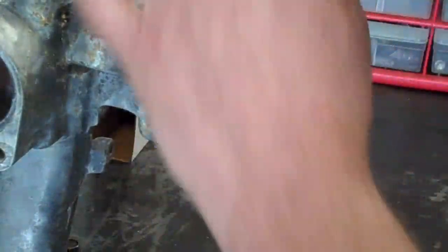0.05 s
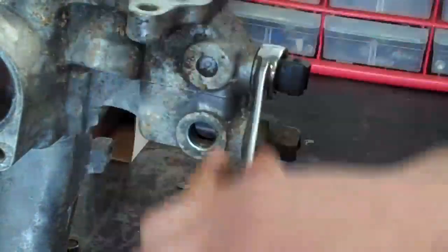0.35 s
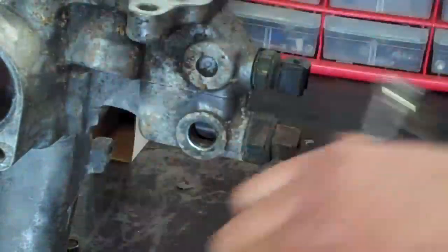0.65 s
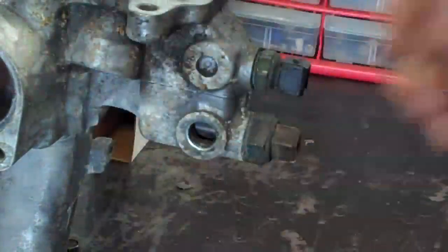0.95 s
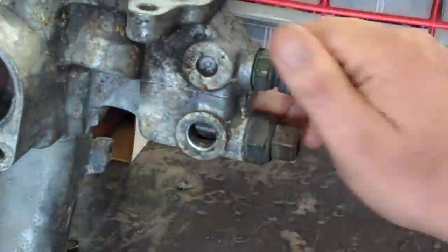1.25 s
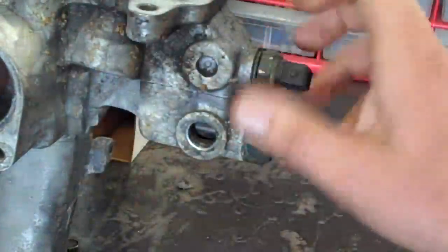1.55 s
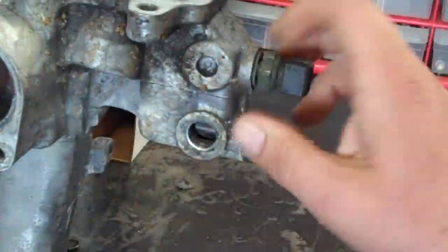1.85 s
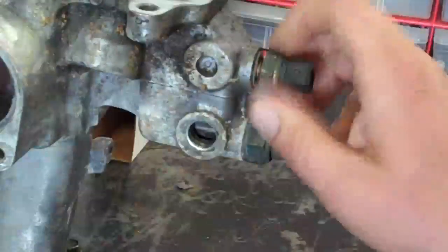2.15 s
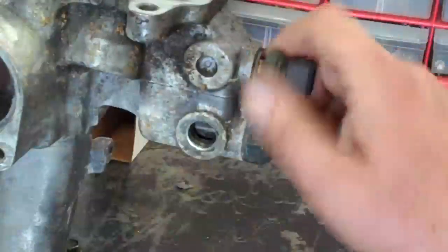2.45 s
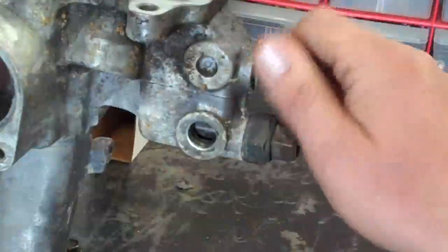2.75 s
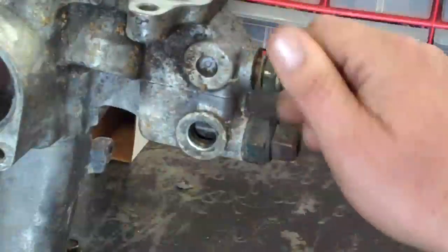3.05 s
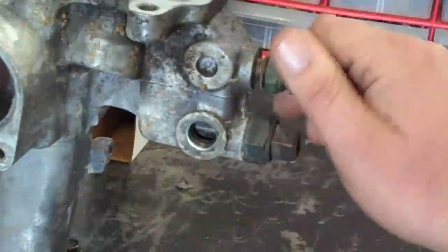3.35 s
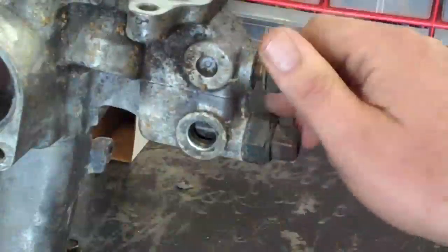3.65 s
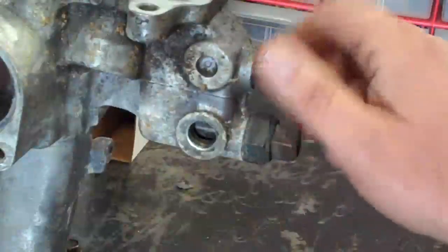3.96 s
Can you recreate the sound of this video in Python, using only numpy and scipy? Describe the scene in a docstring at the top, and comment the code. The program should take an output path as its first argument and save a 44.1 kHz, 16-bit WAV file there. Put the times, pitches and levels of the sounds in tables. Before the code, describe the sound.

A loose metal fitting clinks, chatters and grinds as fingers twist it from its housing.

```python
"""A spanner clinks off a fitting in a cast metal housing on a workbench; fingers twist the fitting out.
At each twist skin rubs, the threads grind, and the loose fitting knocks and chatters in its thread,
making the casting ring. The housing bumps on the bench, and the spanner squeaks as it is put aside.
A small microphone close by also picks up the workshop's quiet rush and hum."""
import sys
import numpy as np
from scipy import signal
from scipy.fft import rfft, irfft
from scipy.io import wavfile
from scipy.ndimage import uniform_filter1d

SR = 44100
rng = np.random.default_rng(int(sys.argv[2]) if len(sys.argv) > 2 else 0)


def materialize(psi):
    """Save the field psi as 16-bit PCM at rate SR to the path in sys.argv[1].

    A 1-D psi becomes a single channel; in a 2-D psi each row is a channel.
    """
    bounded = np.clip(np.atleast_2d(psi).T, -1, 1)
    quanta = np.round(bounded * 32767).astype(np.int16)
    wavfile.write(sys.argv[1], SR, quanta)


N = 176400

# the tones the metal rings with: f/Hz, level/dB, t60/s (t60 is the time to fade by 60 dB)
METAL_TONES = [(421.2, -15.5, 0.33), (880, -18.5, 0.089), (1207, -12.5, 0.096), (1527, -3, 0.15),
               (1917, -2, 0.077), (2268, -6.5, 0.12), (2518, -8, 0.22), (2570, -1.5, 0.16),
               (2847, -0.5, 0.12), (3515, -8.5, 0.2), (3660, -7, 0.14), (3720, -6, 0.23), (3810, -4, 0.17),
               (4346, -2, 0.18), (4792, -1, 0.16), (4990, -3, 0.11), (5190, -13, .1), (5776, -2, 0.15),
               (6000, -2.5, 0.12), (6310, -1, 0.13), (6550, -1, 0.044), (7230, -0.5, 0.073),
               (7744, -3.5, 0.099), (8015, -6.5, 0.1)]
# the housing's clank, many short resonances blurred together: f/Hz, level/dB
CLANK_SPECTRUM = [(100, -75), (250, -5.5), (650, -8), (900, 5), (1200, 4), (1380, -6), (1560, 2.5),
                  (2650, 3.5), (3200, -8.5), (3700, 6.5), (4080, -9), (4600, 0), (5450, -7.5), (6400, 3.5),
                  (8100, -16), (8600, -11), (10500, -30), (14000, -63)]
# stereo width, the part that differs between left and right against the shared part: f/Hz, level/dB
STEREO_WIDTH = [(30, 3), (120, -9), (500, -13), (2500, -6), (5000, 0.5), (8000, 1.5), (14000, -1.5)]
CLANK_T60_S = 0.11


def knocks(tones):
    """Metal hits metal and chatters, giving a clank and a ring; the spot hit favours some of the tones."""
    # each knock: t/s, clank/dB, ring/dB, chatter decay/s, lows/dB, treble/dB, favoured f/Hz, boost/dB
    hits = [(0.27, -59, -55.5, 0.0027, -6, 5, 7100, 1), (0.5145, -37.5, -33, 0.003, 2, 5.5, 6050, 4.5),
            (.581, -36.5, -30, 0.0064, -5, -2, 5000, 6), (.594, -39, -31.5, 0.0041, -7, -4, 3750, 12.5),
            (1.4863, -35.5, -25, 0.0064, -0.5, 0.5, 4530, 16),
            (1.5628, -34.5, -42.5, 0.013, -4.5, 1.5, 6800, 8), (2.047, -56.5, -63, .003, -11, 6, 7650, 8),
            (2.176, -24.5, -26, 0.0082, -8, -4.5, 4100, 0),
            (2.1892, -39, -34.5, 0.0035, -0.5, -21, 2250, 16), (2.779, -52, -49, 0.0047, 8.5, -6, 4350, 6),
            (2.851, -34.5, -30.5, 0.0064, -0.5, 2.5, 3730, 5.5),
            (3.1263, -39.5, -41, 0.0058, 6.5, 1.5, 4860, 11), (3.168, -40.5, -40.5, 0.0018, 1, 9, 4560, 6),
            (3.1745, -39, -31.5, 0.01, 3.5, 6.5, 4670, 14.5),
            (3.490, -43.5, -42, 0.018, 8.5, 3.5, 4300, 11.5),
            (3.516, -43, -39.5, 0.0084, 0.5, -5, 2470, 16), (3.7148, -49, -53, 0.0013, 1.5, -8, 4900, 9),
            (3.7915, -35.5, -31.5, 0.029, 4, -7, 4540, 8)]
    favoured_width_hz, loose_from_s, tight_t60_s = 480, 2.0, 0.35
    out, t = np.zeros((2, N)), np.arange(SR) / SR
    tone_hz = np.array(METAL_TONES)[:, 0]
    blow = signal.unit_impulse(SR)
    lead = SR // 100  # space for the filter to spread ahead of the hit
    for s, clank_db, ring_db, chatter_s, low_db, treble_db, hz, boost_db in hits:
        chatter = amp(3) * unit(grit(per_s=1700, spread_db=3, size=SR) * np.exp(-t / chatter_s))
        tone_gains = amp(boost_db * np.exp(-((tone_hz - hz) / favoured_width_hz) ** 2))
        ringing = np.tensordot(tone_gains, tones, axes=1)
        if s < loose_from_s:  # the fitting damps the ring while it is still tight
            ringing = ringing * fade(tight_t60_s)
        clank = unit(excite(blow + chatter, resonances(CLANK_SPECTRUM, CLANK_T60_S)))
        ring = unit(excite(blow + amp(-10.5) * chatter, ringing))
        knock = np.roll(amp(clank_db) * clank + amp(ring_db) * ring, lead, axis=-1)
        knock = colour(knock, [(2400, low_db), (3500, 0.004), (5000, 0), (6000, treble_db)])
        add(out, np.sqrt(0.019 * SR) * knock[:, :-SR // 10], s - lead / SR)
    return out


def casting_tones():
    """Each tone of the metal in stereo: a ring damped by the hand, and a faint, longer after-ring."""
    after_db, after_stretch, rise_s = -34.5, 0.74 / 0.11, 0.00012
    t = np.arange(SR) / SR
    tones = []
    for hz, db, t60 in METAL_TONES:
        phase, apart = rng.standard_normal(2)
        stereo_phase = np.array([[1], [-1]]) * apart * hz / 22000
        decay = fade(t60) + amp(after_db) * fade(after_stretch * t60)
        tones.append(amp(db) * decay * np.sin(2 * np.pi * (hz * t + phase) + stereo_phase))
    return np.array(tones) * (1 - np.exp(-t / rise_s))


def threads(ring):
    """Dry threads grind in many tiny slips that sound the casting, duller than a knock."""
    # each grind: peak t/s, swell/s, ease-off/s, level/dB
    grinds = [(.505, 0.022, 0.029, -33), (1.485, 0.063, 0.049, -34.5), (1.82, 0.068, 0.067, -43),
              (2.172, 0.034, 0.022, -30.5), (2.465, 0.066, 0.044, -39.5), (2.83, 0.065, 0.11, -41.5),
              (3.15, 0.048, 0.091, -37), (3.492, 0.09, 0.026, -43), (3.81, 0.042, 0.012, -34.5)]
    metal = resonances(CLANK_SPECTRUM, CLANK_T60_S) + amp(0.5) * ring
    dulled = colour(metal, [(2900, 0), (6000, -4.5)])
    slips = grit(per_s=1600, spread_db=3, size=N) * strokes(grinds)
    return excite(slips, unit(dulled[:, :SR // 2]))


def fingers(ring):
    """Skin scratches over the dirty metal in uneven grains that faintly sound its high tones."""
    # each rub: peak t/s, swell/s, ease-off/s, level/dB
    rubs = [(.03, 0.14, 0.18, -54.5), (.45, 0.085, 0.082, -51.5), (.8, 0.3, 0.38, -46.5),
            (1.26, 0.17, 0.57, -47), (1.15, 0.025, 0.09, -46), (1.475, 0.051, 0.042, -37.5),
            (1.58, 0.0079, 0.04, -47), (1.65, 0.051, 0.16, -58.5), (1.79, 0.035, 0.041, -43),
            (1.85, 0.036, 0.066, -41), (2.12, 0.047, 0.13, -42), (2.505, 0.12, 0.067, -43.5),
            (2.56, 0.027, 0.017, -47.5), (2.82, 0.071, 0.031, -47), (3.08, 0.08, 0.17, -53),
            (3.46, 0.059, 0.059, -48.5), (3.755, 0.015, 0.066, -43.5)]
    # the hiss of skin on metal: f/Hz, level/dB
    skin_spectrum = [(200, -14), (1200, -3.5), (3000, -7), (5300, -8), (6400, 2), (7900, -1), (8900, -12.5),
                     (10500, -9), (11300, -22), (14500, -19)]
    scratch = resonances(skin_spectrum, t60=0.016) + amp(-9.5) * unit(colour(ring, skin_spectrum))
    grains = grit(per_s=2200, spread_db=2, size=N) * strokes(rubs)
    return excite(grains, unit(scratch[:, :SR // 2]))


def spanner_squeak():
    """One very short slip and squeak as the spanner is put aside."""
    # the dry tick of the slip: f/Hz, level/dB
    slip_spectrum = [(300, -25), (1500, 11.5), (4000, -4), (7000, -4), (14000, -12)]
    # the squeak's brief tones: t/s, f/Hz, half length/s, level/dB
    squeak_tones = [(.7880, 6450, .0006, -27), (.7899, 2180, .001, -23), (.7895, 2030, .0035, -33),
                    (.7940, 6400, .0014, -36)]
    out, t = np.zeros((2, N)), np.arange(N) / SR
    add(out, amp(-41.5) * np.sqrt(SR / 50) * resonances(slip_spectrum, t60=0.045), s=0.7868)
    for s, hz, half_s, db in squeak_tones:
        out += amp(db) * np.exp(-((t - s) / half_s) ** 2) * np.cos(2 * np.pi * hz * (t - s))
    return out


def bench():
    """A dry tap, a few dull bumps of the housing on the bench, and a finger slapping down as it slips off."""
    # each bump: t/s, level/dB
    bumps = [(0.17, -52.5), (0.234, -50.5), (1.134, -43), (1.232, -53), (1.562, -42), (1.604, -51)]
    # the bench's thud: f/Hz, level/dB
    thud_spectrum = [(60, -46), (220, -6.5), (540, -3), (1000, -13), (2500, -8.5), (8000, -39)]
    tap_hz = 750
    out, t = np.zeros((2, N)), np.arange(SR) / SR
    add(out, -amp(-18.5) * fade(t60=0.0063) * np.sin(2 * np.pi * tap_hz * t), s=1.1335)
    out = colour(out, [(100, -55), (450, -1.5)])  # take the bass out of the tap
    for s, db in bumps:
        add(out, amp(db) * np.sqrt(SR / 50) * resonances(thud_spectrum, t60=0.093), s)
    return out


def workshop():
    """A steady rumble, a soft rush that dies down, and a low wavering hum."""
    # the workshop's noise: f/Hz, level/dB
    air_spectrum = [(15, -55), (32, -2), (129, -3.5), (392, -8.5), (761, -5.5), (892, -2.5), (1360, -3),
                    (3600, -15), (7220, -15), (8030, -24.5), (14000, -26)]
    # how loud the rush and the hum are over time: t/s, level/dB
    rush_levels = [(0, -46), (.25, -48), (.38, -51), (1.0, -47), (1.4, -50), (1.72, -54.5), (4, -54.5)]
    hum_levels = [(0, -64), (1.6, -67.5), (2.1, -72.5), (4, -78)]
    hum_hz, waver_depth, rumble_db = 126.7, 0.0073, -56
    t = np.arange(N) / SR
    waver = np.interp(t, np.linspace(0, N / SR, 24), rng.standard_normal(24))
    hum = np.sqrt(2) * np.sin(2 * np.pi * np.cumsum(hum_hz * (1 + waver_depth * waver)) / SR)
    hum *= amp(np.interp(t, *np.array(hum_levels).T))
    air = unit(stereo(rng.standard_normal((2, N)), air_spectrum)) * np.sqrt(N)
    rumble = colour(air, [(120, -1.0), (400, -11.5)])
    rush = (air - rumble) * amp(np.interp(t, *np.array(rush_levels).T))
    return amp(rumble_db) * rumble + rush + hum


def grit(per_s, spread_db, size):
    """Tiny random collisions of uneven strength, with an average power of 1."""
    strength = amp(spread_db * np.minimum(rng.exponential(size=size), 4)) * rng.choice([-1, 1], size)
    return unit(strength * (rng.random(size) < per_s / SR)) * np.sqrt(size)


def strokes(rows):
    """Loudness over time: each stroke swells to its peak, eases off and stops."""
    edge_db = -16.5
    t = np.arange(N) / SR
    total = np.zeros(N)
    for s, swell_s, ease_s, db in rows:
        away = np.maximum((s - t) / swell_s, (t - s) / ease_s)  # 0 at the peak, 1 at either end
        total += amp(db + edge_db * np.minimum(away, 1)) * (away < 1)
    return uniform_filter1d(total, size=600)


def resonances(spectrum, t60):
    """Many overlapping resonances struck at once: a smooth burst of noise that dies away."""
    burst = rfft(rng.standard_normal((2, SR)) * fade(t60))
    evened = irfft(burst / np.sqrt(uniform_filter1d(np.abs(burst) ** 2, size=90)), SR)
    return unit(stereo(evened, spectrum) * (np.arange(SR) < SR / 2))


def stereo(noises, spectrum):
    """Blend two noises into left and right, shaped to a spectrum."""
    shared, side = noises
    side = colour(side, STEREO_WIDTH)
    return colour(np.array([shared + side, shared - side]), spectrum)


def amp(db):
    """Turn decibels into a gain."""
    return 10 ** (np.asarray(db) / 20)


def unit(x):
    """Scale so that the channels have an average energy of 1."""
    return x / np.sqrt(np.mean(np.sum(x ** 2, axis=-1)) + 1e-18)


def colour(x, points):
    """Filter along a curve of points: f/Hz, level/dB."""
    hz, db = np.array(points, float).T
    f = np.maximum(np.fft.rfftfreq(x.shape[-1], 1 / SR), 1)
    return irfft(rfft(x) * amp(np.interp(np.log(f), np.log(hz), db)), x.shape[-1])


def fade(t60):
    """One second of a fade that drops 60 dB every t60 seconds."""
    return np.exp(-np.log(1000) * np.arange(SR) / SR / t60)


def excite(push, response):
    """The sound of pushing on something, given its stereo response to one sharp tap."""
    return signal.fftconvolve(np.atleast_2d(push), response, axes=-1)[:, :push.shape[-1]]


def add(out, x, s):
    """Mix x in at s seconds."""
    i = int(s * SR)
    out[:, i:i + x.shape[-1]] += x[..., :N - i]


def scene():
    """The handwork with its faint room echo, the squeak and the background."""
    tones = casting_tones()
    ring = unit(tones.sum(axis=0))
    work = knocks(tones) + threads(ring) + fingers(ring) + bench()
    room = unit(colour(rng.standard_normal((2, SR)), [(3000, 1.5), (9000, -7.0)]) * fade(t60=0.55))
    return work + amp(-14.5) * excite(work, room) + spanner_squeak() + workshop()


def record(dry):
    """The microphone's right side is duller than its left, and the highest treble is cut."""
    # how much louder the left side is than the right: f/Hz, level/dB
    balance = [(40, -1.5), (200, 2.5), (2000, 0.7), (6000, -1), (6800, -2), (7600, 14.5), (10000, 6),
               (14000, 2)]
    top_hz = 14350
    left = colour(dry[0], [(hz, db / 2) for hz, db in balance])
    right = colour(dry[1], [(hz, -db / 2) for hz, db in balance])
    return signal.sosfilt(signal.ellip(10, .2, 70, top_hz, fs=SR, output="sos"), np.array([left, right]))


dry = scene()
out = record(dry)
materialize(out)
```